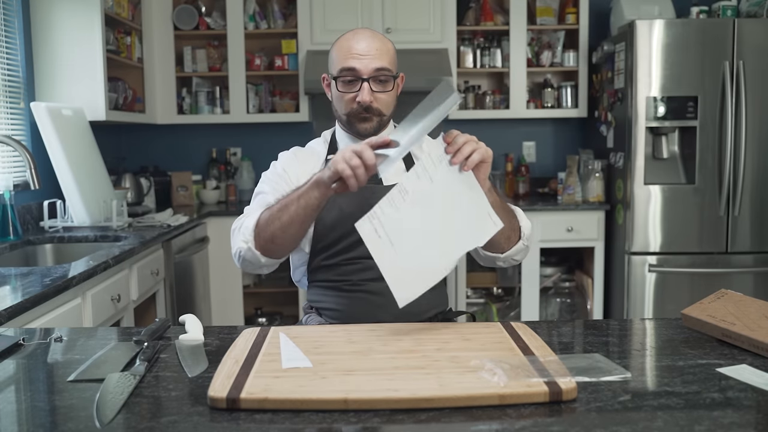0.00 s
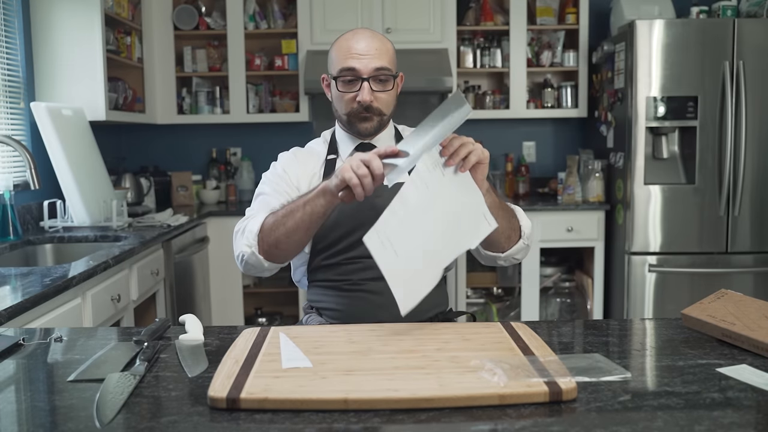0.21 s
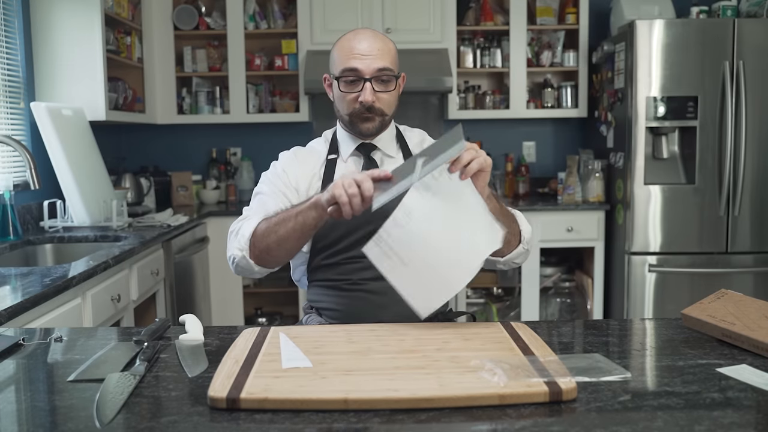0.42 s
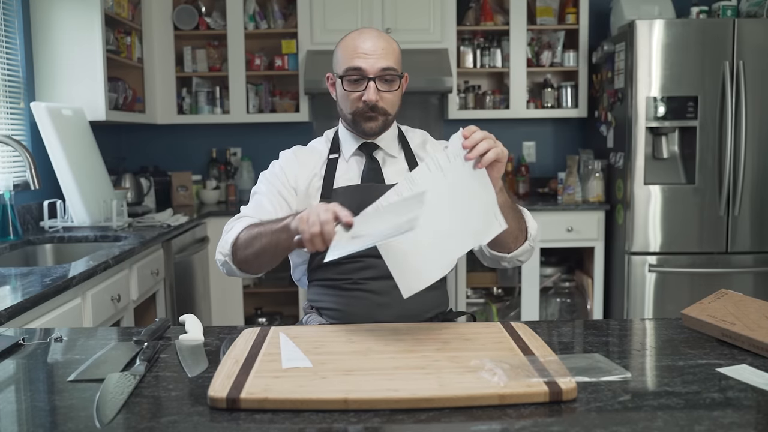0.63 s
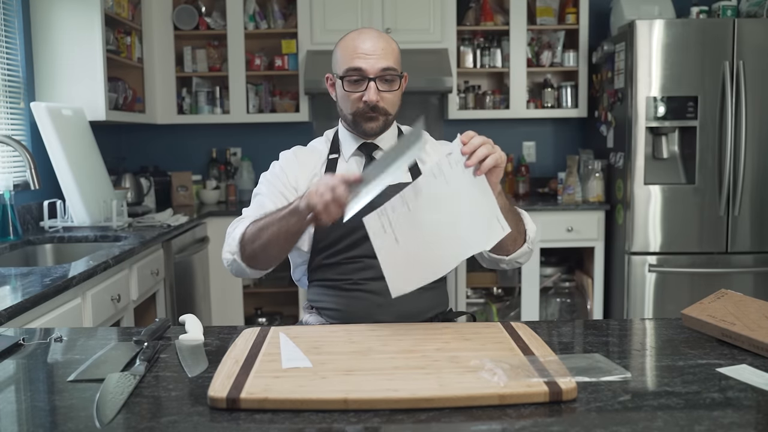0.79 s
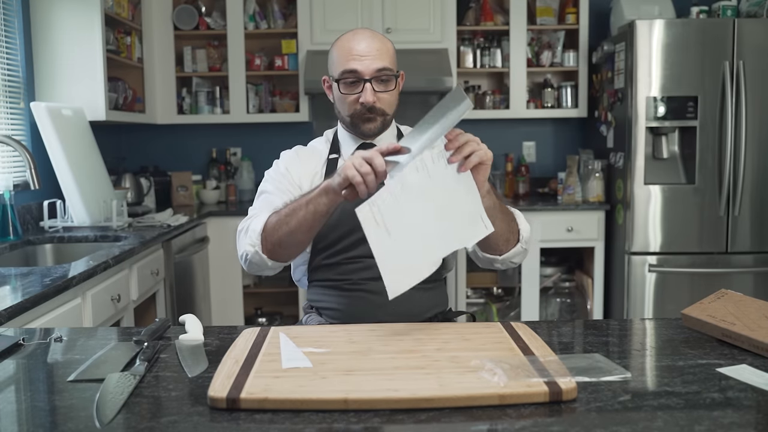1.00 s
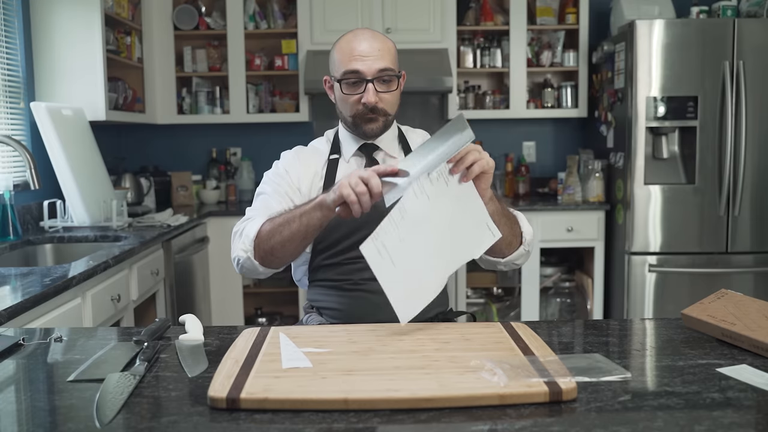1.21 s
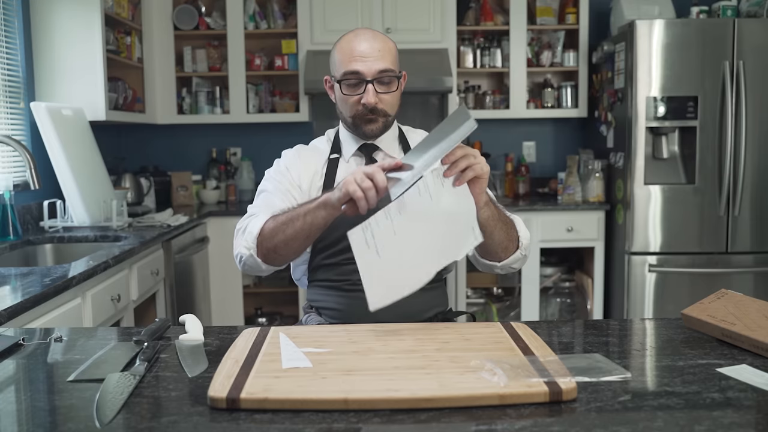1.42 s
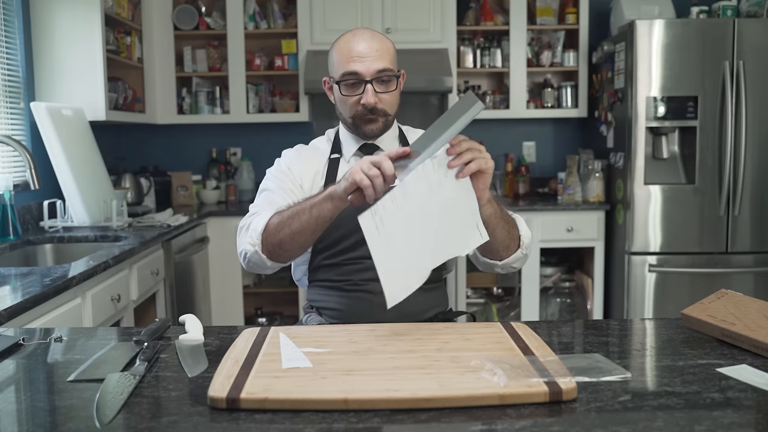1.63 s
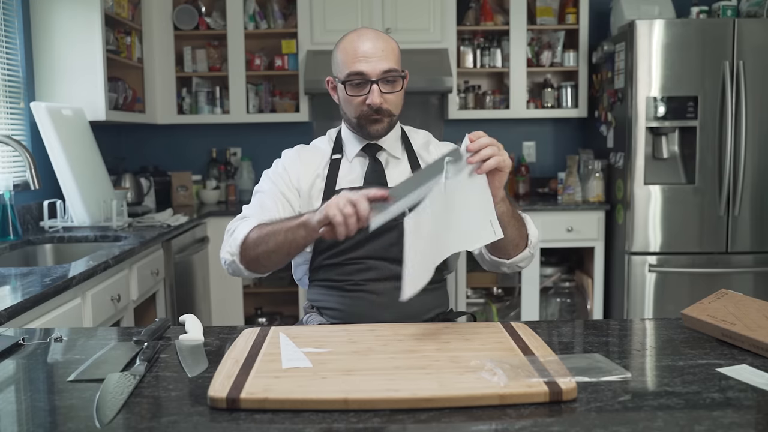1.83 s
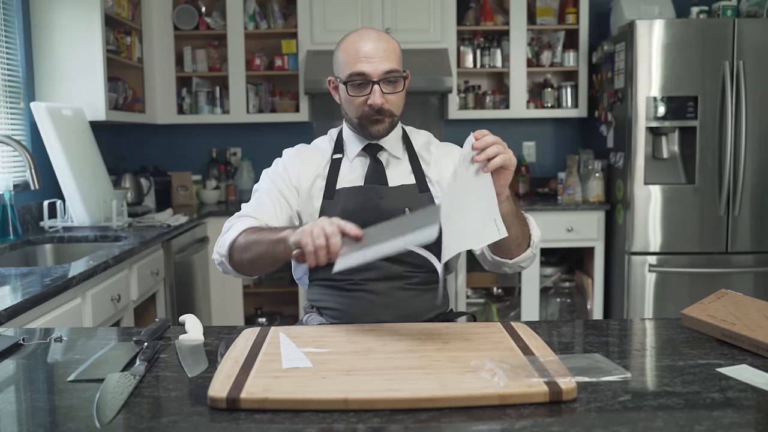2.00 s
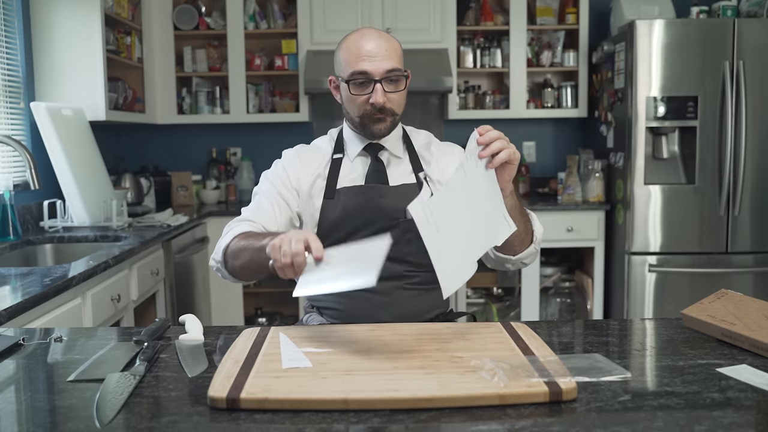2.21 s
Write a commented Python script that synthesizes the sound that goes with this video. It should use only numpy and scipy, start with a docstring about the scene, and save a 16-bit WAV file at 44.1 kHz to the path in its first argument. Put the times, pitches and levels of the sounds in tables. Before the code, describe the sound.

Paper being cut by a steel blade, heard close and dry with slight kitchen reflections. A strong snappy rip comes first, then small ticks and scrapes, then another rip fading to rustling over low hum.

```python
"""The blade rings faintly from the start, over a refrigerator hum and room air that last throughout.
From 0.15 s a cleaver slices and scrapes a hanging sheet of paper, loudest near 0.45 s. It quiets by 0.9 s,
then softer sounds start at 1.07 s and stronger ones at 1.78 s, ending in rustling. Dense clicks make the
tearing, short tones and cracks the snaps, gliding noise the squeaks, low pulses the air puffs, and fading
sines the blade. Noise tails add the hard-walled kitchen around the sheet."""
import sys
import numpy as np
from scipy import signal
from scipy.fft import rfft, irfft
from scipy.io import wavfile
from scipy.ndimage import uniform_filter1d

SR = 44100
rng = np.random.default_rng(int(sys.argv[2]) if len(sys.argv) > 2 else 0)


def unload_audio(sound):
    """Save the sound as a 16-bit wav file, at the path given as the first command line argument."""
    columns = np.transpose(np.atleast_2d(sound))
    # keep every value between -1 and 1, then stretch to whole-number steps
    steps = np.round(np.clip(columns, -1, 1) * 32767)
    wavfile.write(sys.argv[1], SR, steps.astype(np.int16))


N = 101430  # length in samples, 2.3 s

# Tearing, scraping and rustling of the sheet, in consecutive stretches; a stroke may span several lists:
# time_s, tearing level_db, flexing level_db and hiss level_db (both relative to the tearing)
STRETCHES = [
    [(0.154, -80, -1, 0), (0.157, -55, -3, -7), (0.183, -54, 6, -12), (0.196, -35, -12, -6),
     (0.222, -33.5, -7, -4), (0.25, -48, -1.5, -6), (0.296, -53.5, -1, -5), (0.314, -41, 2, -1.5),
     (0.338, -46.5, -1, -3.5), (0.357, -50, 0.5, -15)],
    [(0.357, -45.5, 3, -8), (0.405, -31.5, 0.5, -7.5), (0.434, -34, 4.5, 0.5), (0.474, -17.5, -10, -7.5),
     (0.484, -19.5, -12, -10), (0.515, -45, 3.5, 1), (0.593, -50.5, -5, -7), (0.6, -51, 5, -17)],
    [(0.6, -58, 3, -23), (0.612, -54, 17, -17), (0.67, -55.5, -8, -4.5), (0.742, -64.5, 0, -15),
     (0.75, -59, -0.5, -16), (0.836, -71.5, -6, -21.5), (0.915, -80.5, 9.5, -13.5)],
    [(1.072, -83.5, 1, 1), (1.077, -60.5, -13, 2), (1.112, -51.5, -0.5, 5.5), (1.12, -62, 10, -4),
     (1.144, -47, -2.5, -4), (1.18, -50.5, -1.5, -5), (1.212, -45.5, -6.5, -6), (1.26, -70, -4, -8)],
    [(1.398, -70.5, 7.5, -6.5), (1.41, -51, 3.5, -5), (1.498, -38.5, -18, -8), (1.58, -44.5, -15, -1),
     (1.64, -63.5, -2, -8), (1.676, -52, -13, -2), (1.726, -47, -9.5, -6), (1.76, -55.5, 6, -3),
     (1.778, -55.5, 2, 9)],
    [(1.778, -49, 10, 1), (1.781, -35.5, 1, -7), (1.794, -40, 4, 4.5), (1.86, -26.5, -12, -2.5),
     (1.868, -30.5, -10, -1), (1.972, -32.5, -14, -11.5), (2.05, -35, -3, -4), (2.062, -41, -2, -9)],
    [(2.062, -40.5, -2, -5.5), (2.1, -46.5, -3, -16), (2.3, -61.5, -3, -19)],
]
# Tone colour of tearing fibres: pitch_hz, relative level_db per Hz
TEAR_COLOUR = [(1060, -25.5), (1800, -2.5), (2240, -13.5), (2520, -4), (3150, -1), (3430, 2.5), (4130, 1.5),
               (5030, -5), (6000, -10.5), (7800, -29.5), (13200, -120)]
# Tone colour of the flexing sheet: pitch_hz, relative level_db per Hz
FLEX_COLOUR = [(120, -44), (200, -11), (241, 0.5), (401, -1.5), (455, -5), (885, 2), (2400, 1.5),
               (3120, -27), (5280, -120)]
# Tone colour of the treble hiss: pitch_hz, relative level_db per Hz
HISS_COLOUR = [(2940, -45.5), (5000, -21), (6080, -1), (7500, 2), (10900, -2.5), (14100, -1.5), (15600, -4)]
TEARS_PER_S, TEAR_SPREAD_DB = 9000, 0.5
FLEXES_PER_S, FLEX_SPREAD_DB = 1500, 1
HISSES_PER_S, HISS_SPREAD_DB = 12000, 1
CLUMP_DB, CLUMP_S = 1.8, .003  # fibres give way in bunches
PATCH_DB = 1.5  # unevenness over time and pitch

# Snaps of the sheet: start_s, peak level_db of the tones, middle pitch_hz,
# treble level_db (relative, before TICK_DB is added), time to fall 60 dB_s
SNAPS = [(.168, -27, 1460, -31, 0.015), (.195, -35, 4100, -14, .017), (.229, -32, 3000, -8, 0.0043),
         (.266, -38.5, 835, -12, 0.027), (.294, -37, 2100, 4, 0.0084), (.339, -36, 4220, -4, 0.0086),
         (0.501, -25.5, 3580, -2, .008), (.325, -37, 2180, 5, 0.018), (.358, -41, 1500, -18.5, .015),
         (.38, -26, 1580, -1.5, 0.015), (0.4236, -13, 1692, -16.5, 0.018), (.444, -18.5, 892, 6, 0.0055),
         (.485, -22, 500, -15, 0.0047), (.547, -23.5, 1610, -27, .007), (.752, -46, 1043, -7.5, 0.052),
         (.929, -45.5, 3930, -18, 0.015), (.995, -60, 3990, -6, 0.011), (1.109, -33, 1410, -18, 0.027),
         (1.122, -33.5, 430, -23, 0.045), (1.148, -34, 657, -6.5, 0.045), (1.173, -37.5, 1500, 1, 0.017),
         (1.187, -35.5, 2426, -2.5, 0.039), (1.2045, -34, 3010, 1, 0.021), (1.217, -34.5, 4300, -5, 0.012),
         (1.517, -37, 3370, -10, 0.01), (1.732, -39.5, 424, -35, 0.045), (1.7339, -29.5, 1520, -35, 0.026),
         (1.779, -47, 1520, -14, 0.018), (1.96, -32, 4130, -9, 0.011)]
SNAP_SPREAD = .3  # how far the tones stray from the middle pitch, in natural-log units
TICK_DB, CRACK_DB = -4.5, 1  # relative to the tones
CRACK_SHARE = .9  # crack fade time as a share of the snap's

# Squeaks or flaps of the taut sheet: start_s, length_s, start pitch_hz, end pitch_hz, width_hz,
# rms level_db before the rise and fall
SQUEAKS = [(.3565, 0.052, 1550, 900, 260, -40.5), (.598, 0.043, 1350, 1250, 1000, -36),
           (1.405, 0.105, 1710, 1790, 220, -46.5), (1.28, 0.03, 1100, 1100, 370, -57.5),
           (1.79, 0.071, 1500, 1850, 350, -42.5), (.2, .024, 8150, 7300, 140, -43),
           (1.94, 0.136, 4200, 4300, 660, -36)]
SINGS_HZ = 170  # the steady tone grows as the width falls compared with this

# Ringing modes of the steel blade: pitch_hz, time to fall 60 dB_s
BLADE_MODES = [(2137, 1.9), (2896, 1.4), (3702, 1.3), (4247, 0.54)]
# Times the blade is set ringing: start_s, free time until sheet or hand damps it_s,
# then the starting rms level_db of each mode, before the soft rise
RINGS = [(0, 0.15, -62.5, -61.5, -86, -81), (.2, 0.029, -59, -42.5, -65, -72),
         (.31, 0.014, -40, -64, -62, -44), (.485, 0.63, -66, -65.5, -79, -66),
         (.66, 0.34, -79.5, -76, -58.5, -78), (1.68, 0.061, -59, -75, -75, -54),
         (2.05, .3, -46.5, -66, -69, -43)]
RING_RISE_S, CHOKE_S = .006, 0.025

# Air pushed by the sheet: start_s, level_db before its fade, pitch_hz
PUFFS = [(.385, -34.5, 69.6), (0.431, -25, 130), (.483, -27, 99.6), (.52, -41, 60), (1.195, -51, 79.4),
         (1.78, -41, 75), (1.849, -52, 100), (2.05, -40, 80)]
PUFF_CYCLES = 2.5

# How long the kitchen rings at each pitch: pitch_hz, time to fall 60 dB_s
KITCHEN_FADE = [(100, 0.46), (400, 0.62), (1500, 0.62), (4000, 0.53), (8000, 0.52), (11500, 0.19)]
KITCHEN_DB = -14

# Tone colour of the room air: pitch_hz, relative level_db per Hz
AIR_COLOUR = [(20, 9), (32, 14), (60, 2.5), (250, 1), (420, -6.5), (1000, -9.5), (2300, -14), (4200, -15.5),
              (6000, -25.5), (11200, -33.5), (15600, -43)]
AIR_DB = -62.5  # rms
# Refrigerator hum tones: multiple of HUM_HZ, rms level_db before wavering
HUM_TONES = [(2, -72), (3, -75), (4, -72), (8, -76), (9, -80.5), (10, -87), (11, -77)]
HUM_HZ = 58.4

EDGE_HZ = 15790  # top edge of the whole sound


def amp(db):
    """Turns decibels into gain: every 20 dB is a factor of ten."""
    return 10 ** (np.asarray(db, float) / 20)


def evened(x):
    """Scales to an rms (average strength) of 1."""
    return x / np.sqrt(np.mean(x ** 2) + 1e-20)


def read(points, hz):
    """Reads a pitch table between its points, on a log-pitch axis."""
    f, value = np.transpose(points)
    return np.interp(np.log(hz + 1), np.log(f + 1), value)


def add(mix, s, sound):
    """Mixes a sound in at time s, cutting what runs past the end."""
    part = mix[max(round(s * SR), 0):][:len(sound)]
    part += sound[:len(part)]


def colour(x, points):
    """Gives x a tone colour that falls steeply beyond the table's ends, with no sound ahead of its cause."""
    hz = abs(np.fft.fftfreq(8192, 1 / SR)) + 1
    octaves_below = np.maximum(np.log2(points[0][0] / hz), 0)
    octaves_above = np.maximum(np.log2(hz / points[-1][0]), 0)
    level_db = read(points, hz) - 30 * (octaves_below + octaves_above)
    log_gain = np.log(amp(np.maximum(level_db, -100)))
    # the Hilbert transform finds the phase that makes the filter respond earliest
    spectrum = np.exp(np.conj(signal.hilbert(log_gain)))
    taps = np.fft.ifft(spectrum).real[:4096]
    return signal.oaconvolve(x, taps / np.linalg.norm(taps))[:len(x)]


def clicks(per_s, spread_db):
    """Random clicks of uneven size and either sign, scaled to rms 1."""
    size_db = spread_db * np.minimum(rng.exponential(1, N), 4)
    size = amp(size_db) * rng.choice([-1., 1.], N)
    happens = rng.random(N) < per_s / SR
    return evened(size * happens)


def paper():
    """Dense clicks of tearing, flexing and hiss follow the table's levels and share one bunching."""
    t = np.arange(N) / SR
    levels = np.zeros((3, N))
    for rows in STRETCHES:
        s, tear_db, flex_db, hiss_db = np.transpose(rows)
        for level, db in zip(levels, (tear_db, tear_db + flex_db, tear_db + hiss_db)):
            level += amp(np.interp(t, s, db, left=-200, right=-200))
    drift = uniform_filter1d(rng.standard_normal(N), max(int(CLUMP_S * SR), 1))
    clump = evened(amp(CLUMP_DB * evened(drift)))
    tear_level, flex_level, hiss_level = uniform_filter1d(levels, size=60) * clump
    tearing = colour(tear_level * clicks(TEARS_PER_S, TEAR_SPREAD_DB), TEAR_COLOUR)
    flexing = colour(flex_level * clicks(FLEXES_PER_S, FLEX_SPREAD_DB), FLEX_COLOUR)
    hiss = colour(hiss_level * clicks(HISSES_PER_S, HISS_SPREAD_DB), HISS_COLOUR)
    return tearing + flexing + hiss


def patchy(x):
    """Makes the level uneven in random patches that drift over time and pitch."""
    z = signal.stft(x, nperseg=256, noverlap=192)[2]
    field = rng.standard_normal(z.shape[::-1])
    field = uniform_filter1d(field, size=14, axis=0)  # smooth over time
    field = uniform_filter1d(field, size=3, axis=1)  # smooth over pitch
    gain = evened(amp(PATCH_DB * evened(field).T))
    return signal.istft(z * gain, nperseg=256, noverlap=192)[1][:N]


def snaps():
    """Each snap: a sharp crack, a few close fast-dying tones of the sheet and a bright tick."""
    out, t = np.zeros(N), np.arange(3000) / SR
    for s, peak_db, hz, treble_db, t60 in SNAPS:
        signs = rng.choice([-1., 1.], len(t))
        fade = amp(-60 * t / max(t60, .002)) * np.minimum(t / 0.00051, 1)
        pitches = hz * np.exp(SNAP_SPREAD * rng.uniform(-1.15, 1, 4))
        tones = fade * sum(np.sin(2 * np.pi * pitch * t) for pitch in pitches)
        crack_fade = amp(-60 * t / (CRACK_SHARE * t60))
        bursts = abs(rng.standard_normal(len(t))) ** 2 + .2
        crack = colour(signs * crack_fade * bursts, [(300, 0), (hz + 2500, -4)])
        tick = colour(signs * fade, HISS_COLOUR)
        snap = tones / abs(tones).max()
        snap += amp(CRACK_DB) * crack / abs(crack).max()
        snap += amp(treble_db + TICK_DB) * tick
        add(out, s, amp(peak_db) * snap)
    return out


def squeaks():
    """Friction noise through a steep gliding resonance, with a quick rise and slower fall."""
    out = np.zeros(N)
    for s, length, start_hz, end_hz, width_hz, db in SQUEAKS:
        u = np.arange(int(length * SR)) / (length * SR)  # progress from 0 to 1
        slow = rng.standard_normal(len(u)) + 1j * rng.standard_normal(len(u))
        r = np.exp(-np.pi * width_hz / SR)
        slow = signal.lfilter([1], np.convolve([1, -r], [1, -r]), slow)
        slow = slow + SINGS_HZ / width_hz * abs(slow).mean()  # narrow ones hold a clearer tone
        pitch = start_hz + (end_hz - start_hz) * u
        tone = (slow * np.exp(2j * np.pi * np.cumsum(pitch) / SR)).real  # moves the noise to the pitch
        add(out, s, amp(db) * evened(tone) * np.sin(np.pi * u ** .35))
    return out


def blade():
    """Steel modes ring as pure tones that die slowly until sheet or hand damps them."""
    out, t = np.zeros(N), np.arange(N) / SR
    for s, free_s, *dbs in RINGS:
        rise = np.minimum(t / RING_RISE_S, 1)
        damping = np.exp(-np.maximum(t - free_s, 0) / CHOKE_S)
        ring = np.zeros(N)
        for (hz, t60), db in zip(BLADE_MODES, dbs):
            fade = np.sqrt(2) * amp(db - 60 * t / t60)  # root 2 turns rms into peak
            ring += fade * np.sin(2 * np.pi * (hz * t + rng.random()))
        add(out, s, rise * damping * ring)
    return out


def puffs():
    """The sheet pushes air in low, soft pulses that fade within a few cycles."""
    out = np.zeros(N)
    for s, db, hz in PUFFS:
        turns = np.arange(4000) / SR * hz
        shape = np.minimum(turns, 1) * np.exp(-3 * turns / PUFF_CYCLES)
        add(out, s, amp(db) * np.sin(2 * np.pi * turns) * shape)
    return out


def kitchen(x):
    """Hard walls as noise tails, each pitch dying at its own speed; three tails share the sound in turn."""
    out, turn = np.zeros(N), np.arange(N) / SR * 23
    for k in range(3):
        noise = rng.standard_normal(SR) * (np.arange(SR) > 150)  # a short gap comes first
        hz, t, z = signal.stft(noise, SR, nperseg=256)
        fade = amp(-60 * t / read(KITCHEN_FADE, hz)[:, None])
        tail = signal.istft(z * fade, SR, nperseg=256)[1]
        # the squares of the three windows add up to 1
        window = np.sqrt(2 / 3) * np.cos(np.pi * (turn + k / 3))
        out += signal.fftconvolve(x * window, tail / np.linalg.norm(tail))[:N]
    return out


def refrigerator():
    """A hum of tones at multiples of one pitch, each wavering slowly in level."""
    t = np.arange(N) / SR
    hum = np.zeros(N)
    for k, db in HUM_TONES:
        waver_db = 2.5 * evened(uniform_filter1d(rng.standard_normal(N), size=5000))
        tone = np.sin(2 * np.pi * (k * HUM_HZ * t + rng.random()))
        hum += np.sqrt(2) * amp(db + waver_db) * tone
    return hum


def room_air():
    """Quiet steady air: random noise shaped to its tone colour."""
    gain = amp(read(AIR_COLOUR, np.fft.rfftfreq(N, 1 / SR)))
    return amp(AIR_DB) * evened(irfft(rfft(rng.standard_normal(N)) * gain, N))


def scene():
    """Sheet, direct and through the kitchen, with puffs and blade over the background."""
    sheet = patchy(paper()) + snaps() + squeaks()
    echoes = amp(KITCHEN_DB) * kitchen(sheet)
    mix = sheet + echoes + puffs() + blade() + refrigerator() + room_air()
    return mix[None]


def record(dry):
    """Removes everything above the top edge with a steep low-pass filter."""
    taps = signal.firwin(1023, EDGE_HZ, window=("kaiser", 10), fs=SR)
    return signal.oaconvolve(dry, taps[None], "same")


dry = scene()
out = record(dry)
unload_audio(out)
```